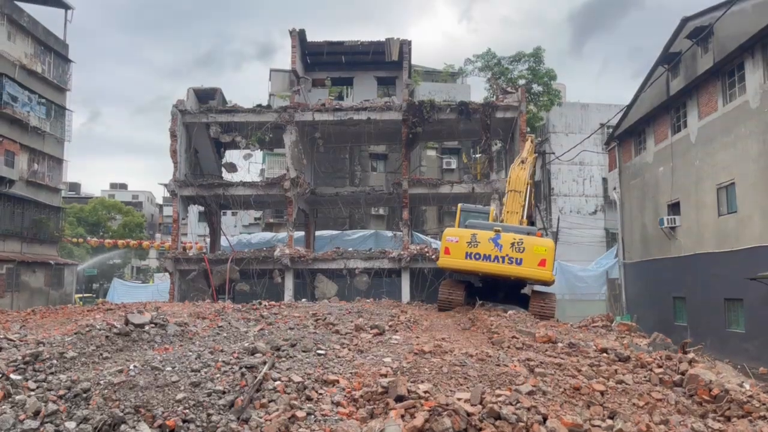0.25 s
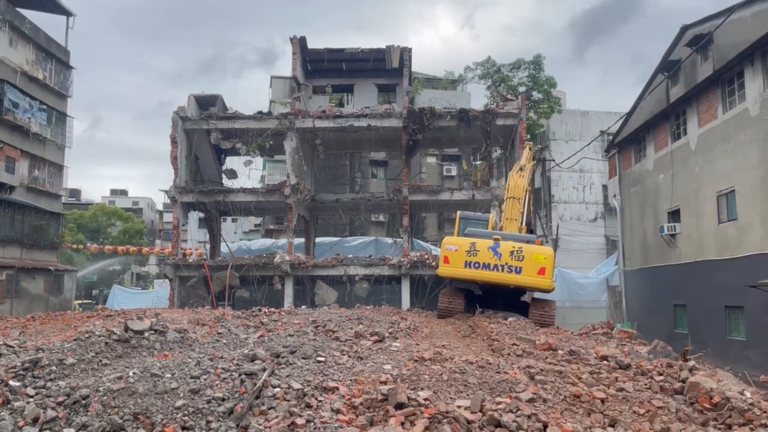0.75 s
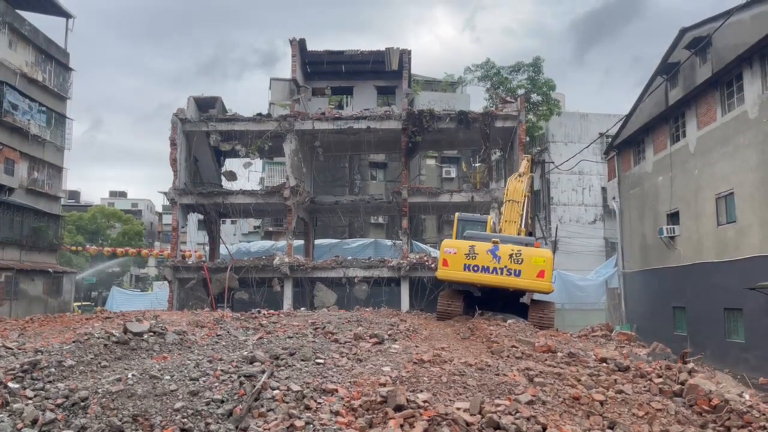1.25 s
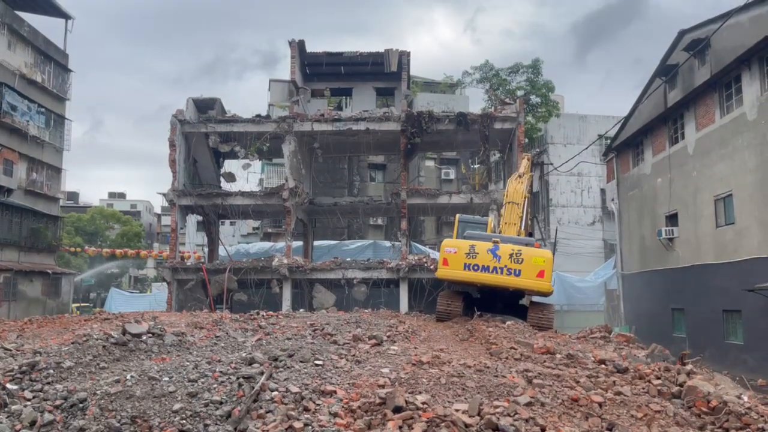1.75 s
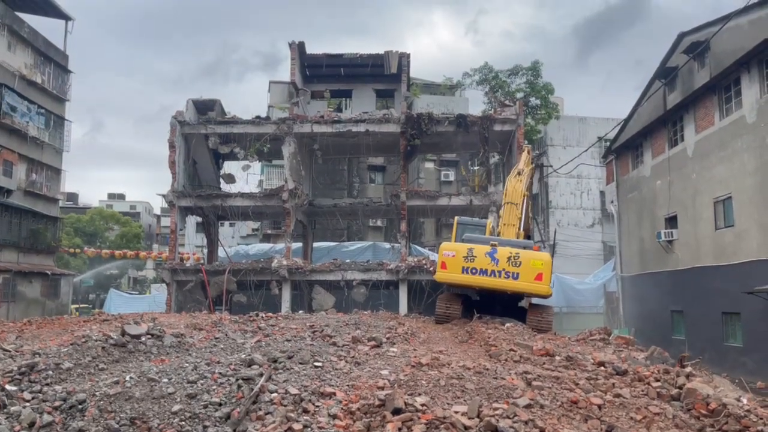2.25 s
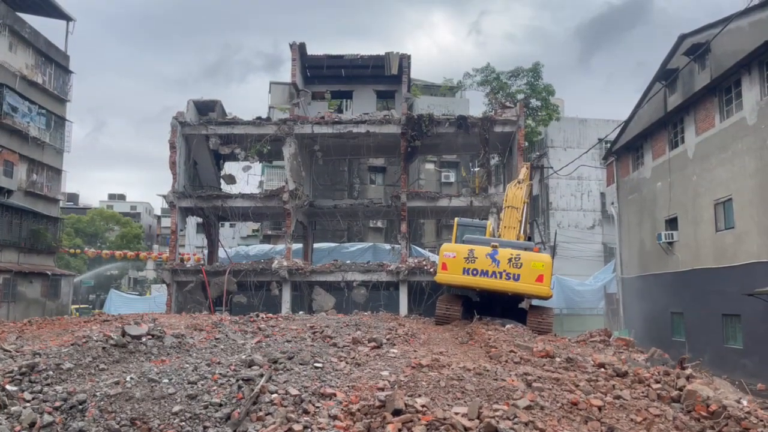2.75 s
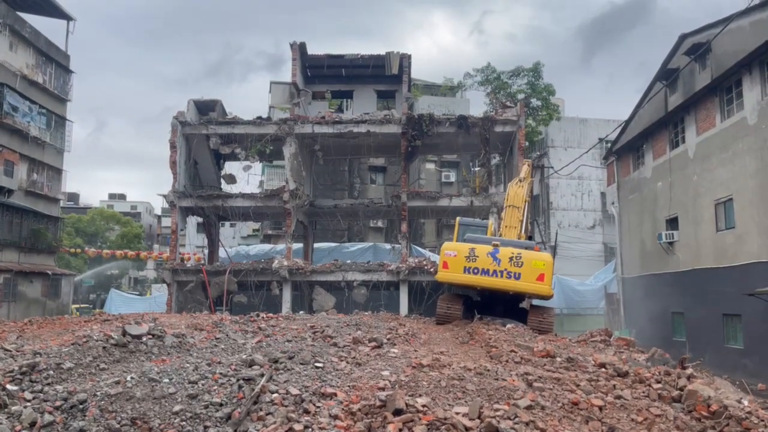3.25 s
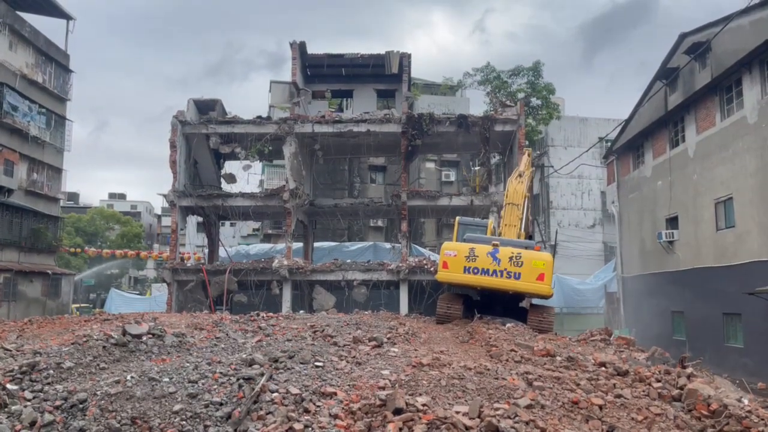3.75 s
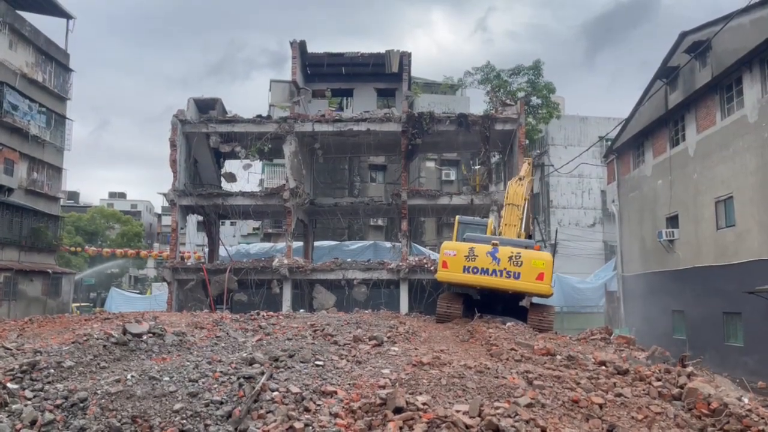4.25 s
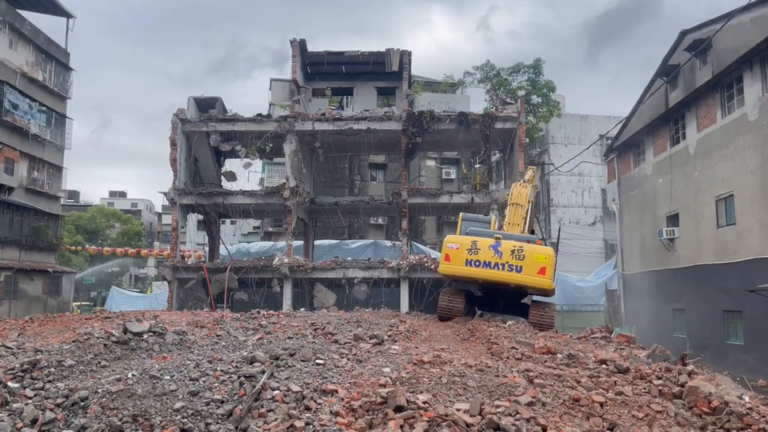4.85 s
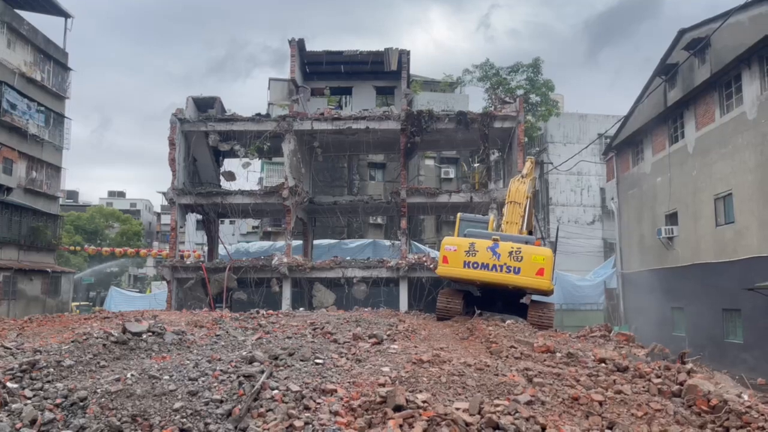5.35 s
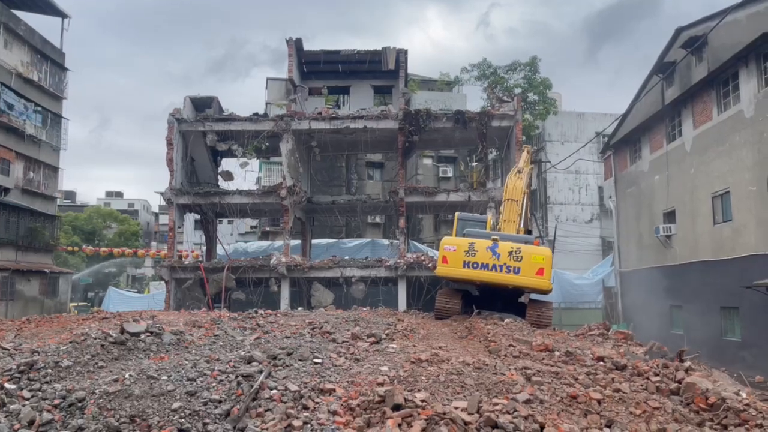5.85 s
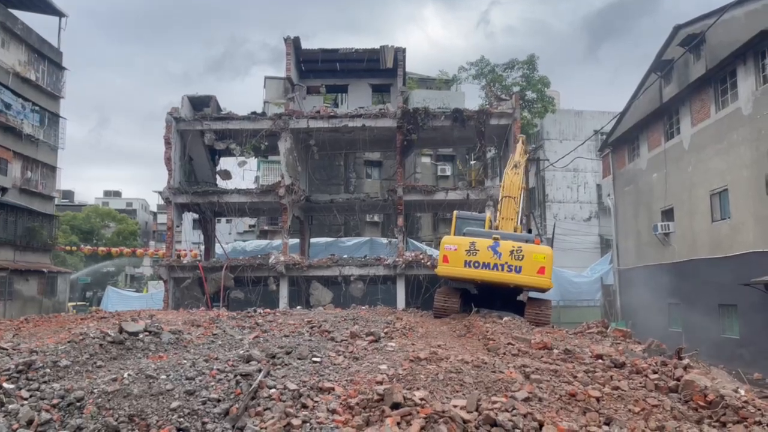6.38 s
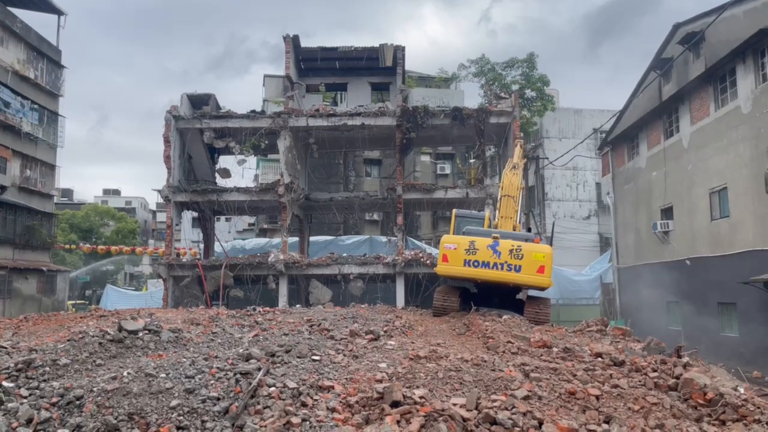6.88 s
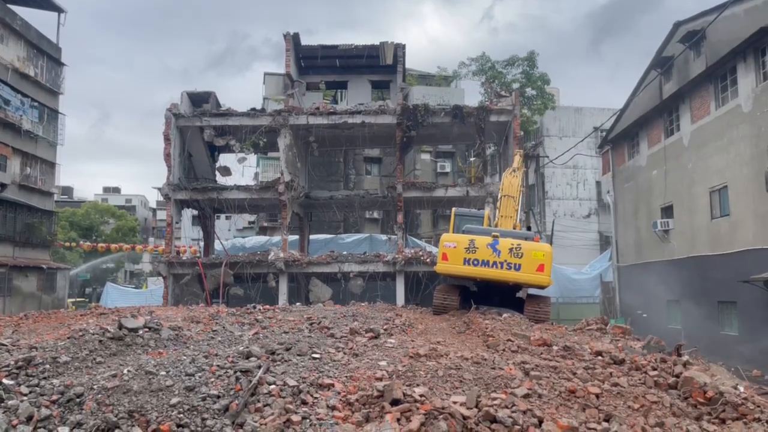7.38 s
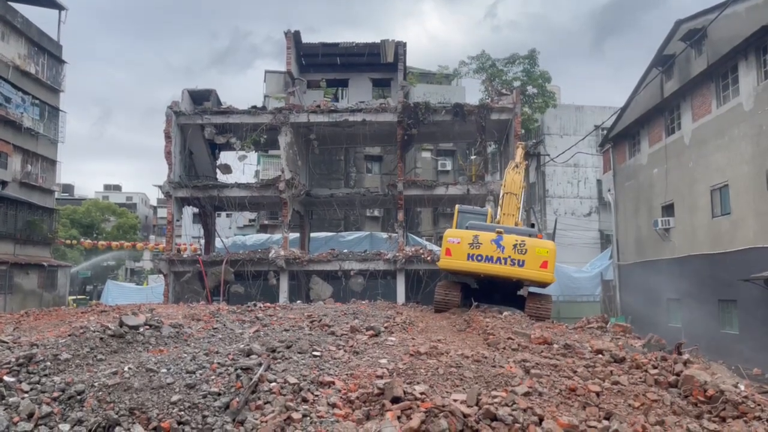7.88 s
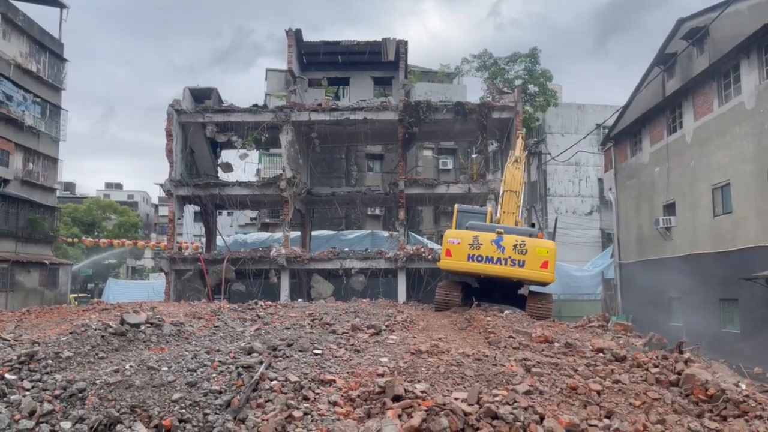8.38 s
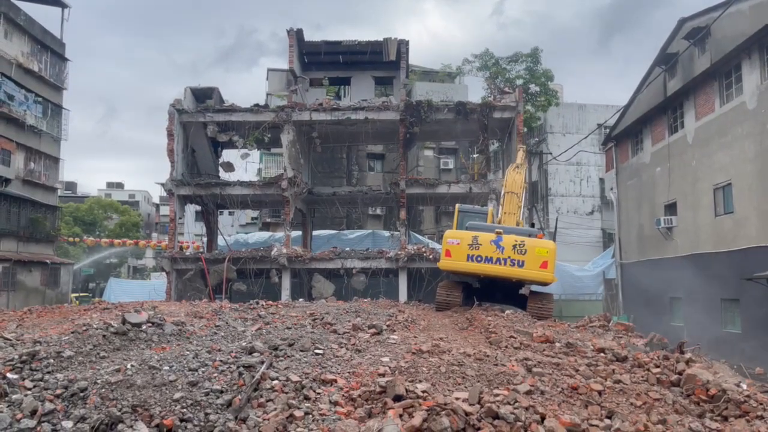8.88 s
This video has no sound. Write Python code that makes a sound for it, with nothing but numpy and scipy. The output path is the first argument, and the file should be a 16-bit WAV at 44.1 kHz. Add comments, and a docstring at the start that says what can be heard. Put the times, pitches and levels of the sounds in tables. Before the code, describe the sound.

A diesel excavator runs throughout, a low throaty drone around 100 Hz with clatter, loose rattles, hydraulic hiss and a very high, faint turbo whine that rises late with each pull; another engine drones far away. It starts loaded, eases at 0.3 s, and thin squeaks lead to a light crack at 0.8 and a big crunching crash at 1.0, knocks tumbling after. Smaller breaks and a brick slide come at 1.7 to 2.4, with a boom groan. A hard crash at 2.8 sheds rubble, then steel squeaks near 3.4. A heavy blow at 4.3 thuds, followed by cracks and clatter at 4.8 to 5.1. The engine labours alone until about 6.4, then revs free. The loudest low knock and crunch hits at 7.16, with debris sliding to 8. Minor thumps precede a last crash at 8.97, all echoing briefly off walls.

```python
"""Rubble field between house walls: an excavator tears at a concrete and brick building.
Blows of the steel tool shape noise into cracks, wall echoes and thuds, and set damped boom modes ringing;
broken brick pours down as short modal knocks. A six-cylinder diesel, a sum of cycle harmonics and noise,
changes speed and swells under load, while a turbo tone glides after the load and the hydraulics hiss.
A second engine drones far off."""
import sys
import numpy as np
from scipy import signal
from scipy.fft import rfft, irfft, next_fast_len
from scipy.io import wavfile
from scipy.ndimage import uniform_filter1d, minimum_filter1d

SR = 44100
rng = np.random.default_rng(int(sys.argv[2]) if len(sys.argv) > 2 else 0)


def transcribe(signal):
    """Save signal, clipped to [-1, 1], as a 16-bit WAV file at the path in sys.argv[1]."""
    frames = np.atleast_2d(signal).T
    limited = np.clip(frames, -1, 1)
    pcm = np.round(limited * 32767).astype(np.int16)
    wavfile.write(sys.argv[1], SR, pcm)


N = 402191
TIME = np.arange(N) / SR
SIZE = next_fast_len(N, real=True)
BINS = np.maximum(np.arange(SIZE // 2 + 1) * SR / SIZE, 1)  # f/Hz of each Fourier bin


def from_db(db):
    """Logarithmic level: decibels to amplitude gain."""
    return 10 ** (np.asarray(db) / 20)


def rms_one(x):
    """Normalisation to unit mean power."""
    return x / np.sqrt(np.mean(x ** 2) + 1e-20)


def at_bins(points):
    """Spectral interpolation: a table over log frequency, read at every bin."""
    hz, value = np.transpose(points)
    return np.interp(np.log(BINS), np.log(hz), value)


def drift(rate_hz):
    """Random modulation: low-passed noise of unit rms."""
    return rms_one(irfft(rfft(rng.standard_normal(SIZE)) / (1 + (BINS / rate_hz) ** 2))[:N])


def band(x, low_hz, high_hz):
    """Causal band-pass filtering."""
    sos = signal.butter(2, [low_hz, min(high_hz, SR / 2 - 1)], "band", fs=SR, output="sos")
    return signal.sosfilt(sos, x)


def hiss():
    """Incoherence: two independent white noises."""
    return rng.standard_normal((2, N))


def delayed(x, s):
    """Propagation delay: the same signal, later."""
    return np.interp(TIME - s, TIME, x)


def swell(start, end):
    """Smooth envelope: a rounded rise and fall."""
    return np.sqrt(np.clip(4 * (TIME - start) * (end - TIME) / (end - start) ** 2, 0, 1))


def linger(power, t60):
    """Reverberation: power builds up and dies away exponentially, 60 dB per t60."""
    r = from_db(-120 / (t60 * SR))
    return signal.lfilter([1 - r], [1, -r], power + 1e-18)


def dying(age, db, t60):
    """Exponential decay: gain of a sound that starts at a level and dies away."""
    return from_db(db - 60 * age / t60)


def grains(per_s, spread_db):
    """Impulsive noise: random clicks, a few much larger than the rest, on two independent channels."""
    sizes = from_db(spread_db * np.minimum(rng.exponential(1, N), 4))
    return rms_one(hiss() * sizes * (rng.random(N) < per_s / SR))


def clunks(per_s, cycles, top_hz, size_db=1.7):
    """Modal impact: random strikes, each with its own size, place and three briefly ringing modes."""
    out = np.zeros((2, N + SR))
    for when, pitch, size, place, second, third in rng.random((int(per_s * N / SR), 6)):
        ratios = np.array([[1], [1.25 + .6 * second], [2 + third]])
        hz = 330 * (top_hz / 330) ** pitch * ratios
        t60 = min(cycles / hz[0, 0] + .015, .2)
        age = np.arange(int(t60 * SR)) / SR
        modes = np.sin(2 * np.pi * hz * age).sum(axis=0)
        rung = modes * dying(age, 0, t60) / np.sqrt(t60) * np.minimum(age / .002, 1)
        strength = from_db(size_db * min(-np.log(1 - size), 2.5))
        start, angle = int(when * N), 2 * np.pi * place
        out[:, start:start + len(age)] += strength * np.sqrt(hz[0]) * rung * [[np.cos(angle)], [np.sin(angle)]]
    return rms_one(out[:, :N])


# Left-right correlation of the sound field: f/Hz, correlation
CORRELATION = [(90, 0.92), (250, 0.6), (450, 0.56), (650, 0.28), (1000, 0.22), (1600, 0.25), (2800, -0.32),
               (3900, 0.39), (4900, -0.34), (7000, 0.29), (8700, 0.51), (10000, 1)]


def spread(pair, spectrum):
    """Spatial coherence: colour two independent signals, mix them to a set correlation; rms 1."""
    mid, side = rfft(pair, SIZE) * from_db(at_bins(spectrum))
    alike = np.clip(at_bins(CORRELATION), -1, 1)
    return rms_one(irfft(np.sqrt(1 + alike) * mid + np.sqrt(1 - alike) * side * [[1], [-1]])[:, :N])


# Tool on masonry: yield t/s, level/dB, treble re level/dB, thud re level/dB, bite duration t/s
BLOWS = [(.826, -27.5, -3.5, -2, 0.016), (1.021, -19, 6.5, -6, 0.089), (1.712, -30.5, 11.5, -14, 0.005),
         (1.795, -25.5, 2, -10, 0.03), (2.342, -29, -22, -17, 0.011), (2.797, -14, 5.5, -9, 0.009),
         (3.31, -31, 8.5, -13, 0.02), (4.303, -11, -1, -8, 0.017), (4.605, -36, 4, -15, 0.02),
         (4.79, -28, -1, -20, 0.03), (4.865, -22.5, -1.5, -16, 0.003), (7.155, -14, 2, -4.5, 0.059),
         (7.633, -30, -17, -16, 0.055), (8.004, -26, -16, -2, 0.028), (8.665, -25.5, -26, -10, 0.0031),
         (8.967, -14.5, 1.5, -7, 0.064), (9.04, -20, 1.5, -14, 0.023)]
ATTACK_S, CRUSH_S = 0.004, 0.035
# bite level against the yield; its treble is lower by the second value
BITE_DB, BITE_TREBLE_DB = 1, -4.5


def crushing(levels_db, bite_db=BITE_DB):
    """Load and yield: power grows as the tool bites, then the masonry gives and is crushed for a moment."""
    power = np.zeros(N)
    for (s, _, _, _, bite_s), db in zip(BLOWS, levels_db):
        near = slice(int((s - bite_s) * SR), int((s + CRUSH_S) * SR))
        age = TIME[near] - s
        bite = from_db(2 * bite_db) * np.clip(1 + age / max(bite_s, 1 / SR), 0, 1) ** 2
        power[near] += from_db(2 * db) * np.maximum(bite, np.clip(age / ATTACK_S, 0, 1))
    return linger(power, t60=.06)


# Breaking concrete, relative spectrum: f/Hz, level/dB
CRUSH = [(60, -13), (210, -4), (300, 4), (420, 0), (540, 0), (800, 2), (1050, -7), (1350, -9), (1720, -9),
         (2500, -10.5), (3600, -13.5), (5200, -14), (8000, -17.5), (11000, -21.5)]
# Modes of boom and tool, before the common steel gain: f/Hz, level/dB, t60/s
STEEL = [(355.3, -7.5, 1), (375.3, -12, 0.068), (445.5, -11.5, 0.71), (483, -21, 0.39),
         (622.5, -11.5, 0.16), (800, -14, 0.33), (1263, -19.5, 0.36), (1670, -21, 0.12), (1840, -35, 0.7),
         (2300, -20, 0.26), (3860, -30, 0.6), (3630, -21, 0.93), (5633, -30, 0.45), (5931, -25, 0.59)]


def crashes(direct_db=-1.5, low_t60=1.0, high_t60=0.9, split_hz=1040.0, wall_s=0.024,
            thud_t60=0.99, thud_db=-1.5, steel_db=3.5, crack_db=-7.5, chunk_db=-6.5):
    """Impact and reverberation: dense cracks, their wash between walls, a slab thud and ringing steel."""
    _, level, treble, thud, _ = np.transpose(BLOWS)
    chunks = from_db(chunk_db) * clunks(per_s=330, cycles=30, top_hz=3223)
    cracks = spread(hiss() + from_db(crack_db) * grains(4000, 1.0) + chunks, CRUSH)
    cracks = cracks * from_db(.8 * drift(120))
    wash = spread(hiss() + from_db(-8) * clunks(per_s=260, cycles=40, top_hz=3500), CRUSH)
    low_pass = signal.butter(1, split_hz, fs=SR)
    cracks_low, wash_low = signal.lfilter(*low_pass, cracks), signal.lfilter(*low_pass, wash)
    body, edge = crushing(level), crushing(level + treble, BITE_DB + BITE_TREBLE_DB)
    out = np.zeros((2, N))
    for power, near, far, t60 in [(body, cracks_low, wash_low, low_t60),
                                  (edge, cracks - cracks_low, wash - wash_low, high_t60)]:
        returned = delayed(linger(power, t60), wall_s)
        out += from_db(direct_db) * np.sqrt(power) * near + np.sqrt(returned) * far
    # the floor slab shudders on after the bite
    shudder = rms_one(band(band(hiss()[0], 65, 154), 41, 440))
    out += from_db(thud_db) * np.sqrt(linger(crushing(level + thud), thud_t60)) * shudder
    for hz, db, t60 in STEEL:
        # reflections blur each mode, and shift it between the ears more the higher it is
        phase = 2 * np.pi * np.cumsum(hz + (5 + hz / 250) * drift(26.1)) / SR
        ear_shift = np.array([[0], [min(hz / 1500, 1.5)]])  # radians
        out += from_db(steel_db + db) * np.sqrt(linger(body, t60)) * np.sin(phase + ear_shift)
    return out


# Sharp splits of concrete and brick: t/s, crack level/dB, t60/s, brick crunch re crack/dB
FRACTURES = [(.832, -27, .06, -7), (1.008, -21, 0.045, 2), (1.025, -7, 0.094, -11), (1.033, -13, 0.054, -6),
             (1.046, -12, 0.086, -9), (1.709, -31, 0.16, 3), (2.355, -34, 0.055, -1),
             (2.805, -16.5, 0.11, -10), (2.819, -11.5, 0.072, -10), (2.995, -29, .07, 2),
             (4.305, -25, .12, 7), (4.317, -24, .1, 5), (4.365, -19, .08, -3), (4.867, -23, 0.064, -10),
             (4.897, -25, .05, -12), (7.159, -10, 0.084, -1), (7.194, -20, .04, -5), (7.217, -19, 0.066, 0),
             (7.238, -21, .05, -2), (7.274, -23, 0.041, -7), (8.972, -16.5, .08, 0), (8.992, -23, .08, -2)]
# Crunch of splitting brick, relative spectrum: f/Hz, level/dB
CRUNCH = [(700, -27), (1150, 4), (1650, 0.5), (2200, 1), (2800, -42), (6000, -15)]


def fractures():
    """Brittle fracture: each split starts at once and decays exponentially; brick adds its crunch."""
    crack, crunch = np.zeros((2, N))
    for s, db, t60, crunch_db in FRACTURES:
        near = slice(int(s * SR), int((s + 2 * t60) * SR))
        level = dying(TIME[near] - s, db, t60)
        crack[near] += level
        crunch[near] += level * from_db(crunch_db)
    concrete = crack * spread(hiss() + grains(6000, 1.0), CRUSH)
    return concrete + crunch * spread(hiss() + grains(3000, 1.0), CRUNCH)


# Later slides of loosened brick, before the slide decay: start t/s, end t/s, level/dB
SLIDES = [(1.692, 1.906, -23), (3.085, 3.486, -27), (4.54, 4.954, -26.5), (7.525, 7.808, -30.5)]
SLIDE_T60_S = 0.77
# every blow sheds brick; the level is against the blow
SHED_DELAY_S, SHED_DB, SHED_T60_S = 0.098, -6, 1.0


def pouring():
    """Energy summation: falling brick shed by each blow, plus the later slides."""
    shed_power = crushing(np.array(BLOWS)[:, 1] + SHED_DB)
    shed = linger(delayed(shed_power, SHED_DELAY_S), SHED_T60_S)
    slides = sum(from_db(2 * db) * swell(start, end) for start, end, db in SLIDES)
    return np.sqrt(shed + linger(slides, SLIDE_T60_S))


# Brick fragments, relative spectrum: f/Hz, level/dB
BRICK = [(100, 3), (250, 2), (400, 3.5), (800, 1.5), (1100, -8.5), (2000, -8.5), (3000, -12), (5000, -18.5),
         (8000, -18.5), (11000, -60)]


def rubble(pieces_per_s=110.0, ring_cycles=77.0, fragment_db=-7.5, grit_db=-5.0, lumps_per_s=36.0, lump_db=-10.0):
    """Superposed random impacts: fragments clack over grit and diffuse hiss, with lower-pitched lumps."""
    fragments = from_db(fragment_db) * clunks(pieces_per_s, ring_cycles, top_hz=2802)
    lumps = from_db(lump_db) * clunks(lumps_per_s, cycles=27, top_hz=589)
    pieces = fragments + hiss() + from_db(grit_db) * grains(2500, 1.2)
    return (spread(pieces, BRICK) + lumps) * pouring() * from_db(1.3 * drift(4))


def ring(clicks, hz, t60):
    """Damped resonator: a unit click sets a sine of height 1 ringing."""
    r, w = from_db(-60 / (t60 * SR)), 2 * np.pi * hz / SR
    return signal.lfilter([0, np.sin(w)], [1, -2 * r * np.cos(w), r * r], clicks + 1e-18)


# Big lumps of masonry knocking down: t/s, lower mode f/Hz, its level/dB
KNOCKS = [(.832, 767, -16.5), (.84, 380, -25), (.988, 717, -9), (1.031, 374, -8), (1.046, 567, -12),
          (1.155, 620, -17), (1.162, 400, -15), (1.803, 720, -17), (1.865, 417, -17), (1.921, 387, -24),
          (1.965, 350, -20), (2.107, 422, -25), (2.356, 690, -19), (2.361, 444, -20), (2.552, 610, -30),
          (2.805, 432, -5.5), (2.826, 780, -11.5), (2.888, 334, -14), (2.93, 754, -21), (2.997, 106, -21),
          (3.427, 357, -24), (3.971, 408, -20), (4.311, 530, -9), (4.363, 464, -11), (4.425, 395, -19),
          (4.785, 800, -22), (4.825, 450, -23), (4.866, 362, -15), (4.872, 685, -21), (4.897, 706, -21),
          (4.969, 352, -34), (5.022, 616, -19), (5.05, 418, -19.5), (5.11, 764, -24), (7.161, 375, -1.5),
          (7.212, 830, -12), (7.236, 830, -13), (7.273, 856, -15), (7.304, 640, -19), (7.88, 397, -24.5),
          (8.69, 677, -26), (8.935, 700, -19), (8.958, 380, -13.5), (8.985, 340, -17), (9.007, 810, -18),
          (9.108, 790, -13)]
KNOCK_T60_S = 0.073


def knocks(overtone=1.507, overtone_db=-9.5, wall_s=0.015, wall_db=-2.5):
    """Modal impact and reflection: a lump sounds two short modes, and a wall sends them back."""
    out = np.zeros(N)
    for s, hz, db in KNOCKS:
        click = np.zeros(N)
        click[round(s * SR)] = from_db(db)
        out += ring(click, hz, KNOCK_T60_S)
        out += from_db(overtone_db) * ring(click, hz * overtone, KNOCK_T60_S / overtone)
    # the echo reaches the right sooner
    return np.array([out + from_db(wall_db) * delayed(out, lag) for lag in (wall_s, wall_s / 2)])


# Heavy pieces of slab landing: t/s, lower mode f/Hz, its level/dB
SLABS = [(1.006, 59, -18.5), (2.88, 77, -19), (4.316, 56, -21), (4.42, 66.6, -20), (7.29, 70, -24),
         (8.98, 62.6, -21)]


def slabs(slab_t60=0.58, rise_s=0.016, overtone=1.2, overtone_db=-2.0, rumble_db=-6.5, rumble_t60=4.6):
    """Low-frequency modes: a slab lands softly on two; the building's frame rumbles on after blows."""
    out = np.zeros(N)
    for s, hz, db in SLABS:
        near = slice(int(s * SR), int(s * SR) + SR)
        age = np.maximum(TIME[near] - s, 0)
        modes = np.sin(2 * np.pi * hz * age) + from_db(overtone_db) * np.sin(2 * np.pi * hz * overtone * age)
        out[near] += modes * np.minimum(age / rise_s, 1) * dying(age, db, slab_t60)
    shaking = np.sqrt(linger(crushing(np.array(BLOWS)[:, 1]), rumble_t60))
    return out + from_db(rumble_db) * shaking * rms_one(band(hiss()[0], 52, 89))


# Splinters, before the decay filter: t/s, level/dB
CHIPS = [(1.031, -20), (2.821, -16), (3.33, -25), (4.625, -28.5), (5.17, -35), (7.147, -21.5), (8.873, -28)]


def chips(chip_t60=0.1, low_hz=4770.0, high_hz=12000.0):
    """Band-limited transient: small splinters snap off with a bright tick."""
    power = np.zeros(N)
    for s, db in CHIPS:
        power += from_db(2 * db) * (np.abs(TIME - s) < .004)
    bright = band(spread(hiss(), [(3000, -2), (11000, 2)]), low_hz, high_hz)
    return np.sqrt(linger(power, chip_t60)) * rms_one(bright)


# Groans of the boom as it is worked: start t/s, end t/s, level/dB before the fits
GROANS = [(1.278, 1.56, -23.5), (1.783, 2.04, -25.5), (2.882, 3.33, -23), (7.363, 7.623, -22.5)]


def boom_groan(hz=358.0, waver_hz=5.67):
    """Friction-driven resonance: rubbing keeps the boom's lowest mode sounding, in fits."""
    level = sum(from_db(db) * swell(start, end) for start, end, db in GROANS)
    fits = from_db(2.5 * drift(30) - 3.5)
    return level * fits * np.sin(2 * np.pi * np.cumsum(hz + waver_hz * drift(26.8)) / SR)


# Thin squeaks of steel: start t/s, end t/s, f/Hz, left level/dB, right re left/dB
SQUEAKS = [(.615, .675, 4990, -47, 3), (.695, .745, 5010, -48, 3), (0.755, 0.824, 4980, -49, 3),
           (3.33, 3.386, 1850, -34.5, 3), (3.43, 3.572, 1840, -38, -4), (3.514, 3.63, 1157, -38, 5),
           (6.762, 6.85, 5020, -52, 5), (8.868, 8.9, 3400, -42, 2), (8.875, 8.91, 5430, -40, 5)]


def squeaks(waver_share=0.0045):
    """Stick-slip: dry steel sounds a high, unsteady note."""
    phase = 2 * np.pi * np.cumsum(1 + waver_share * drift(150)) / SR
    return sum(from_db(db) * swell(start, end) * np.sin(hz * phase) * from_db([[0], [right_db]])
               for start, end, hz, db, right_db in SQUEAKS)


PULL_RAMP_S = 0.123


def pull(start, end):
    """Linear load ramp: a pull builds up, holds and lets go."""
    return np.clip(.5 + np.minimum(TIME - start, end - TIME) / PULL_RAMP_S, 0, 1)


# Hydraulics pulling on the engine: start t/s, end t/s, load/dB, turbo target f/Hz
PULLS = [(-.3, 0.324, 10, 11370), (1.704, 2.373, 7, 11060), (3.446, 3.982, 5, 11070),
         (4.756, 5.495, 7.5, 10890), (5.633, 6.4, 7.5, 11280), (7.166, 7.375, 5.5, 10600),
         (7.575, 8.437, 8, 11240), (8.878, 9.398, 7.5, 11100)]


def effort():
    """Superposition of loads: total engine load in dB."""
    return sum(db * pull(start, end) for start, end, db, _ in PULLS)


def flutter(depth_db):
    """Independent band modulation: each half octave of the middle range of two noises flutters by itself."""
    noise, edges = hiss(), np.geomspace(450, 5000, 8)
    whole = rfft(noise, SIZE)
    for low, high in zip(edges, edges[1:]):
        part = irfft(whole * (BINS >= low) * (BINS < high))[:, :N]
        noise = noise + part * (from_db(depth_db * drift(22)) - 1)
    return noise


# Engine speed: t/s, firing rate f/Hz before slight random wander
SPEED = [(0.0, 93.0), (0.2, 93.0), (0.38, 101.8), (0.76, 103.6), (1.04, 95.8), (1.38, 94.2), (1.44, 97.6),
         (1.58, 100.0), (2.02, 94.0), (2.26, 97.2), (2.42, 103.0), (2.76, 100.6), (2.88, 103.0),
         (3.36, 99.2), (3.52, 96.4), (3.86, 96.0), (4.06, 103.0), (4.36, 99.0), (4.48, 94.8), (4.7, 95.8),
         (4.78, 92.8), (5.24, 94.4), (5.36, 93.0), (5.48, 95.6), (5.8, 94.2), (5.9, 95.6), (6.12, 92.6),
         (6.52, 102.8), (6.66, 103.6), (6.86, 98.0), (7.52, 98.2), (7.8, 94.0), (8.36, 95.8), (8.6, 104.4),
         (8.86, 96.0), (9.12, 97.2)]
# Exhaust lines: multiple of the six-firing cycle, relative level/dB
ORDERS = [(2, -25), (4, -24), (7, -20.5), (9, -34), (10, -20), (12, -11.5), (17, -16.5), (18, -21),
          (20, -23), (22, -20), (24, -25), (26, -24.5), (28, -25.5), (36, -28)]
# Engine clatter and fan, relative spectrum: f/Hz, level/dB
MACHINE = [(25, -28), (42, -16), (62, -2), (98, 0), (160, -6), (225, -9.5), (290, -9.5), (480, -12.5),
           (800, -14), (1200, -20), (1520, -19.5), (1800, -22.5), (2100, -23.5), (2550, -23), (3000, -26),
           (4100, -27), (7000, -29), (9500, -31), (11000, -31.5)]
# levels with no pull; share of the load that the clatter follows
EXHAUST_DB, MACHINE_DB, MACHINE_FOLLOWS = -28.5, -27.5, 0.081


def diesel(waver_db=3.0, throb=0.075, patchy_db=0.66, overtone_db=-25.5, load_share=0.27, surge_db=1.5,
           hood_hz=611.0, hood_width_hz=18.0, hood_db=12.0):
    """Harmonic source and resonance: firing tone, unequal-cylinder lines that bloom at the hood, clatter."""
    firing_hz = np.interp(TIME, *np.transpose(SPEED))
    cycle_hz = firing_hz * (1 + .002 * drift(13.6)) / 6
    cycle = 2 * np.pi * np.cumsum(cycle_hz) / SR
    firing = np.sin(6 * cycle)
    tone = from_db(EXHAUST_DB + effort() + surge_db * drift(7)) * firing
    lines = 0
    for k, db in ORDERS:
        bloom = hood_db / (1 + ((k * cycle_hz - hood_hz) / hood_width_hz) ** 2)
        lines += from_db(db + bloom + waver_db * drift(1.6)) * np.sin(k * cycle + 2 * np.pi * rng.random())
    lines = lines * from_db(overtone_db + load_share * effort())
    pulsing = 1 + throb * firing
    clatter = spread(flutter(1.3) * pulsing * from_db(patchy_db * drift(21)), MACHINE)
    return np.sqrt(2) * (tone + lines) + clatter * from_db(MACHINE_DB + MACHINE_FOLLOWS * effort())


def rattle(rattle_db=-9.5, touches_per_s=130.0, ring_cycles=170.0):
    """Random modal contacts: loose panels and track links clatter, their level following engine load."""
    colour = [(300, 6.0), (700, 0.5), (1200, -5.5), (2200, -12.0), (4000, -20.0)]  # f/Hz, level/dB
    touches = spread(clunks(touches_per_s, ring_cycles, top_hz=2001), colour)
    return touches * from_db(MACHINE_DB + MACHINE_FOLLOWS * effort() + rattle_db)


# Hydraulic hiss bands: f/Hz, width f/Hz, right mean level/dB, left re right/dB
PUMP = [(2127, 66, -51, -1.5), (3602, 120, -58, 2)]
# the turbo follows the pulls with a time constant and a delay
SPOOL_S, SPOOL_DELAY_S, TURBO_REST_HZ, TURBO_FIRST_HZ = .26, .05, 10300, 11100
# its level grows with pitch, between rest and full; both before flicker
TURBO_REST_DB, TURBO_FULL_DB, TURBO_FULL_HZ = -60, -40.5, 10950


def whistles(blur_hz=59.8):
    """First-order lag: turbo pitch and level follow the load late; hydraulics hiss as narrow-band noise."""
    r = np.exp(-1 / (SPOOL_S * SR))
    target_hz = TURBO_REST_HZ + sum((hz - TURBO_REST_HZ) * pull(start, end) for start, end, _, hz in PULLS)
    spooled_hz = signal.lfilter([1 - r], [1, -r], target_hz, zi=[TURBO_FIRST_HZ])[0]
    turbo_hz = delayed(spooled_hz, SPOOL_DELAY_S)
    level_db = np.interp(turbo_hz, [TURBO_REST_HZ, TURBO_FULL_HZ], [TURBO_REST_DB, TURBO_FULL_DB])
    flicker = from_db(3.5 * drift(25) - .8)
    phase = 2 * np.pi * np.cumsum(turbo_hz + blur_hz * drift(110)) / SR
    out = flicker * from_db(level_db) * np.sin(phase)
    for hz, width, db, left_db in PUMP:
        narrow = rms_one(band(hiss()[0], hz - width / 2, hz + width / 2))
        out = out + from_db(db + 2 * drift(5.4)) * narrow * from_db([[left_db], [0]])
    return out


# Lines of the distant engine: multiple of its cycle, rms level/dB before waver
FAR_LINES = [(3, -52), (5, -44), (6, -41), (10, -36)]
FAR_CYCLE_HZ = 10.55


def far_engine(waver_db=2.0):
    """Beating: a steady harmonic drone whose top line lies close to the excavator's firing tone."""
    cycle = 2 * np.pi * np.cumsum(FAR_CYCLE_HZ * (1 + .003 * drift(1))) / SR
    lines = sum(from_db(db + waver_db * drift(2)) * np.sin(k * cycle + 2 * np.pi * rng.random())
                for k, db in FAR_LINES)
    return np.sqrt(2) * lines


def scene():
    """Superposition of all sources, with the diesel a little to the right by level difference."""
    masonry = crashes() + fractures() + rubble() + knocks() + slabs() + chips()
    machine = diesel() * from_db([[-.4], [.4]]) + rattle() + whistles() + boom_groan() + squeaks()
    return masonry + machine + far_engine()


# Response of each microphone: f/Hz, level/dB
LEFT_MIC = [(300, -0.5), (850, 1), (2150, 0.5), (4000, -1.5), (5300, 1), (7200, -6.5), (8600, -5.5),
            (10500, -1.5), (11500, -5), (12600, -34)]
RIGHT_MIC = [(300, -0.5), (850, -2), (2150, 3), (4000, -2), (5300, -9.5), (7200, -16), (8600, -6.5),
             (10500, -5), (11500, -3), (12600, -33)]
# Phase lag of the left port in the top treble: f/Hz, lag/turns
PORT_LAG = [(8700, 0), (10200, .5), (11750, 1)]
CUTOFF_HZ = 12900


def record(dry):
    """Transfer functions: microphone colour, left port phase, a peak limiter, then a steep low-pass."""
    left = from_db(at_bins(LEFT_MIC)) * np.exp(-2j * np.pi * at_bins(PORT_LAG))
    pair = irfft(rfft(dry, SIZE) * np.array([left, from_db(at_bins(RIGHT_MIC))]))[:, :N]
    headroom = np.minimum(1, .93 / (np.abs(pair).max(axis=0) + 1e-9))
    gain = uniform_filter1d(minimum_filter1d(headroom, size=41), size=41)
    return signal.sosfilt(signal.ellip(10, .1, 80, CUTOFF_HZ, fs=SR, output="sos"), pair * gain)


dry = scene()
out = record(dry)
transcribe(out)
```